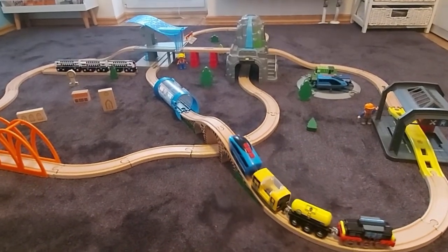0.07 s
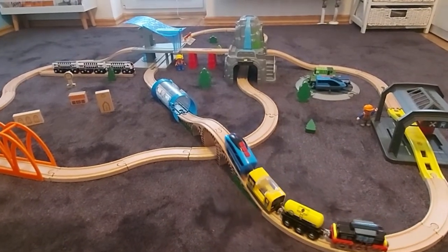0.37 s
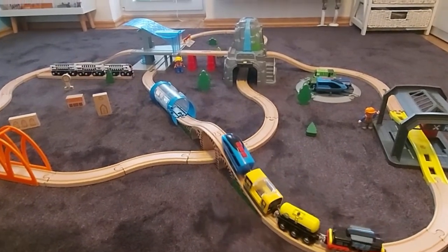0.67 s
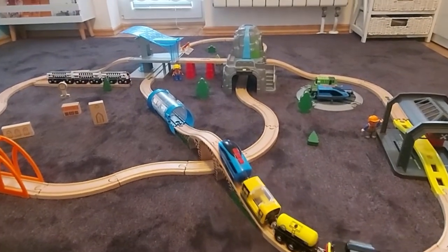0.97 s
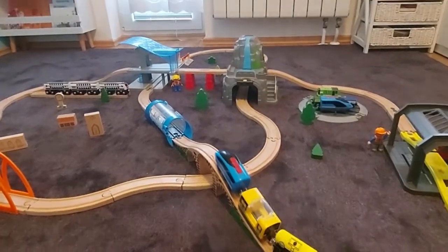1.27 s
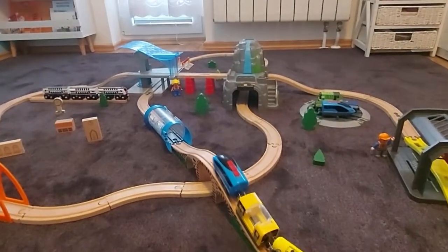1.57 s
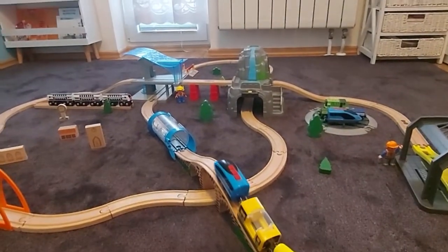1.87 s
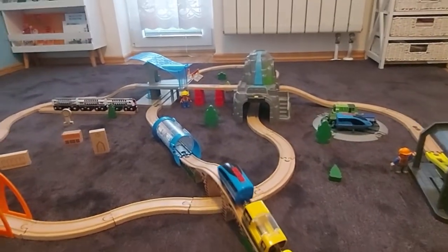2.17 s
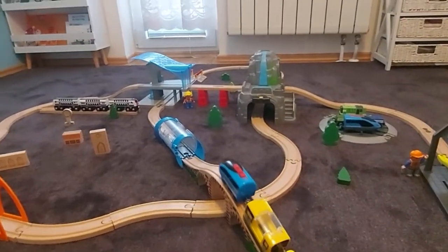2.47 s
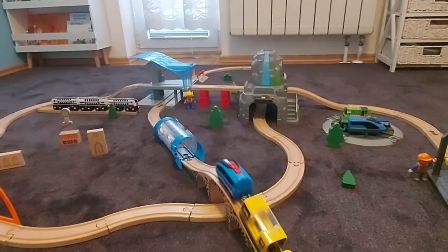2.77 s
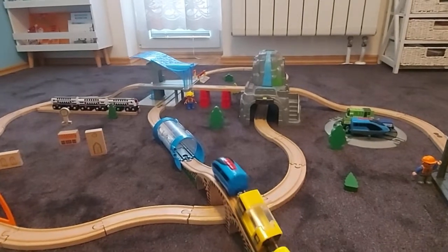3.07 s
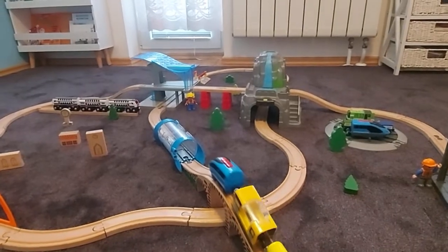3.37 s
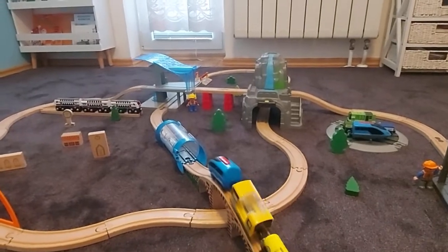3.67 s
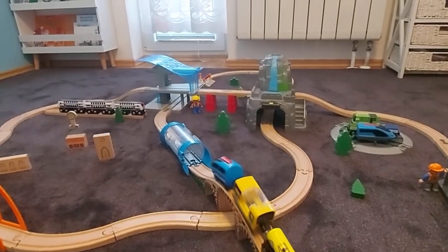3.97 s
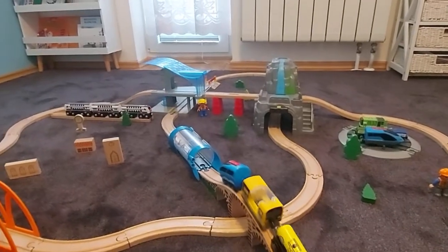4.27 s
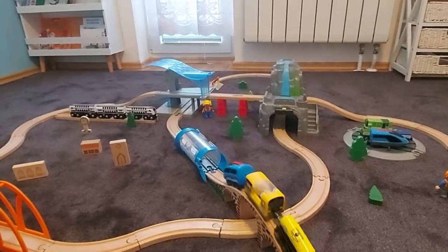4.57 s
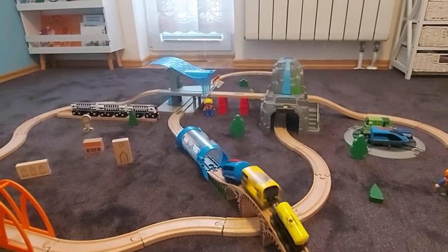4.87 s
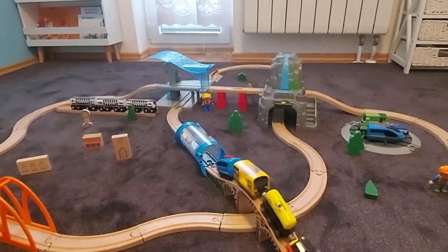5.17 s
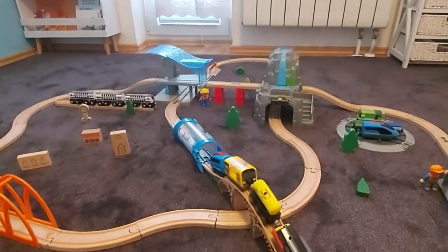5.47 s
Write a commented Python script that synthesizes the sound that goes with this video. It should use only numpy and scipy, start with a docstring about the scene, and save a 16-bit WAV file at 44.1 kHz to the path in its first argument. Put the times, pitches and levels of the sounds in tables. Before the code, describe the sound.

In a carpeted room, about a metre from the microphone, a toy train's electric motor strains with a rattling buzz and stuttering bursts of hard plastic ratcheting. Its wheels rumble softly and bump over the joints of a wooden track while couplings tick. Past the middle the load eases: the ratcheting ends and a gear whine rises in pitch and takes over, with thin high axle squeaks and one light knock.

```python
"""The gearbox of a battery toy engine hauling wagons up a wooden bridge in a carpeted room, a metre away.
Under load a gear slips in short runs; each impact, one per gear turn, excites the modes of the plastic
housing and stirs up tooth chatter. Over the crest the motor speeds up and the chatter gives way to a whine
on harmonics of the shaft rate. Friction makes the brushes hiss and the dry axles squeal, while the wheels
rumble on the wood and bump at the rail joints, and the couplings tick."""
import sys
import numpy as np
from scipy import signal
from scipy.fft import rfft, irfft
from scipy.io import wavfile
from scipy.ndimage import uniform_filter1d, minimum_filter1d

SR = 44100
rng = np.random.default_rng(int(sys.argv[2]) if len(sys.argv) > 2 else 0)


def inscribe(sig):
    """Save sig as 16-bit PCM at rate SR to the path in sys.argv[1].

    A 1-D sig is mono; a 2-D sig holds one channel per row.
    Samples are clipped to [-1, 1] before scaling.
    """
    pcm = np.round(np.clip(np.atleast_2d(sig).T, -1, 1) * 32767)
    wavfile.write(sys.argv[1], SR, pcm.astype(np.int16))


N = 243873
TIME = np.arange(N) / SR

# spectrum of the wheel rumble: frequency_hz, gain_db
RUMBLE_SPECTRUM = [(20, -34), (30, -26), (42, -11), (65, -6), (110, -6), (200, -9), (400, -28)]
# resonances of the hollow track: frequency_hz, gain_db
TRACK_SPECTRUM = [(30, -40), (120, -24), (230, -5), (330, 2), (550, -4), (720, -17), (1000, 5),
                  (2000, -33.5)]
# soft bumps at rail joints: start_s, level_db, pitch_hz, track_ring_db
JOINT_BUMPS = [(.548, -31, 70, -43.5), (0.746, -31, 80, -39), (0.934, -33, 80, -37),
               (.999, -35.5, 100, -49), (1.179, -41, 70, -55), (1.27, -53, 300, -41),
               (1.658, -37.5, 91, -42.5), (3.17, -35, 95.1, -57), (4.559, -13, 1307, -39),
               (4.629, -22, 542, -46)]
# ticks of the couplings: start_s, body_db, bright_edge_db
COUPLING_TICKS = [(0.1033, -17, -44), (0.5382, -34, -41), (0.9187, -32, -38), (1.2451, -17, -43),
                  (1.6536, -15, -41), (2.389, -15, -40), (2.5025, -11.5, -41), (2.8294, -15, -38),
                  (2.8694, -14, -36), (2.9996, -15, -38), (3.3969, -11, -48), (3.5302, -13, -45),
                  (3.7553, -10, -53), (4.6208, -10, -33.5)]
# squeals of dry axles: start_s, end_s, start_pitch_hz, end_pitch_hz, bandwidth_hz, level_db
AXLE_SQUEALS = [(-.2, 1.084, 5250, 5320, 242, -40.5), (0.204, 1.103, 8960, 9200, 219, -50.5),
                (0.599, 1.598, 10680, 10570, 896, -49.5), (1.2, 2.5, 7870, 7150, 450, -48),
                (2.542, 3.95, 14160, 13400, 910, -49), (3.798, 5.601, 13190, 13200, 701, -49),
                (4.05, 4.7, 6540, 6520, 506, -33.5), (4.805, 5.7, 6970, 7780, 700.3, -37)]
# motor speed, labouring on the climb and then running free: time_s, shaft_rate_hz
SHAFT_SPEED = [(0, 141.4), (.3, 138.1), (.7, 142.1), (1.2, 140), (1.5, 132.9), (1.8, 142.4), (2.4, 142.6),
               (2.75, 146.8), (3.0, 153), (3.82, 153.3), (3.898, 162.1), (4.282, 179.2), (4.35, 177.6),
               (4.384, 183.1), (4.706, 192.8), (4.73, 189), (4.966, 194.8), (5.04, 190.3), (5.386, 192.5),
               (5.48, 195.9)]
# effort of the drive: time_s, gear_noise_db, brush_hiss_db
DRIVE_LEVELS = [(0, -21.5, -33), (.4, -24.5, -36), (.8, -21, -36.5), (1.15, -27, -35.5),
                (1.6, -35.5, -33.5), (2.3, -26, -33), (3.0, -18.5, -29), (3.7, -19, -27.5),
                (3.92, -20.5, -29.5), (4.4, -13.5, -28.5), (5.0, -15, -31), (5.53, -17.5, -31.5)]
# spectrum of the brush hiss: frequency_hz, gain_db
BRUSH_SPECTRUM = [(2500, -13.5), (4200, 0.5), (4900, -3.5), (5400, 1), (5900, 1), (6700, 2.5), (7700, -2.5),
                  (8350, -14), (8700, -7.5), (9600, -10.5), (10500, -11), (12200, -14), (13500, -15),
                  (15800, -26)]
# commutator tones on the shaft rate: harmonic_number, level_db
COMMUTATOR_TONES = [(32, 6), (36, 7), (39, 6), (42, -1), (44, -0.5), (45, -6), (48, -2.5), (51, -4.5),
                    (57, -6)]
# buzz of loose wagon parts, relative to the gear noise: time_s, level_db
LOOSE_PART_LEVELS = [(0, -12.5), (1.3, -12), (1.8, -43), (5.53, -22)]
# resonances of those parts: frequency_hz, gain_db
LOOSE_PART_SPECTRUM = [(450, -21), (580, -5), (690, -9), (830, -3.5), (1000, 5.5), (1250, -5.5),
                       (3200, -12), (3800, 4.5), (4550, 7), (5000, -0.5), (6500, -17), (9000, -17)]
# gear whine under load: harmonic_number, level_db
LOADED_HARMONICS = [(1, -34), (2, -20), (3, -54), (4, -24), (5, -22), (6, -14), (7, -13), (8, -4.5),
                    (9, -4.5), (10, 2.5), (11, 2), (12, 6), (13, 11), (14, 6), (15, -16), (16, -4),
                    (17, -5), (18, -23)]
# gear whine running free: harmonic_number, level_db
FREE_HARMONICS = [(1, -40), (2, -61), (3, -28.5), (4, -45), (5, -16.5), (6, -17.5), (7, -0.5), (8, -11),
                  (9, -0.5), (10, -3), (11, -6), (12, 1), (13, -4), (14, -19), (15, -5.5), (16, -7),
                  (17, -16), (18, -15), (19, -22), (20, -19), (21, -29), (22, -18), (23, -21), (24, -29),
                  (25, -35), (26, -28), (27, -23), (28, -16.5), (29, -22), (30, -21.5)]
# prominence of the seven-tooth pinion's tone: time_s, gain_db
PINION_GAIN = [(4.3, -3), (4.85, -5.5), (5.1, -2.5), (5.38, 4), (5.53, 3)]
# response of the housing to tooth chatter: frequency_hz, gain_db
CHATTER_SPECTRUM = [(400, -39.5), (820, -37), (1000, -4), (1200, -7), (1400, 3), (1800, 6), (2350, -0.5),
                    (2700, 4.5), (2950, 3.5), (3300, -3.5), (4500, -11.5), (4950, -47), (5500, -20),
                    (8500, -37.5)]
# weak housing modes rung by a skipped tooth: frequency_hz, gain_db
HOUSING_SPECTRUM = [(200, -27.5), (750, -34.5), (1000, -17.5), (1250, 2.5), (1650, 4), (2300, 4.5),
                    (2900, -2.5), (3400, -6), (3800, -3.5), (4550, -3), (4950, -13.5), (5500, -7.5),
                    (7500, -18.5), (9000, -27.5)]
# runs of slipping, where a final half turn is the gear catching early: start_s, length_turns, level_db
SLIP_RUNS = [(.0196, 0, -8), (.0759, 3.5, -3.5), (.2195, 3, -4.5), (.4217, 1, -7), (.508, 0, -7),
             (.5653, 1, -6.5), (.6495, 8, -2.5), (.9322, 1, -8.5), (.9887, 1.5, -5), (1.0741, 0, -5),
             (1.1606, 0, -10), (1.2178, 0, -8.5), (1.2461, 2.5, -1.5), (1.3637, 1, -1.5), (1.4546, 0, -4),
             (1.5721, 1, -6.5), (1.6624, 0, -2.5), (1.7188, 1.5, -2), (1.8025, 1, -5), (1.8596, 6.5, -1),
             (2.0842, 3.5, -1), (2.2257, 2.5, -2), (2.3124, .5, -2), (2.3375, 4.5, -1), (2.4763, 4.5, -1),
             (2.6159, 4.5, -1), (2.7534, 0, -1), (2.8079, 0, -1), (2.889, 2, -1.5), (2.9947, 1, -1.5),
             (3.0722, 1, -1), (3.2476, 0, -2), (3.3338, 1, -2), (3.4168, 0, -2), (3.5467, 0, -1.5),
             (3.6002, 0, -1)]

LABOUR_HZ, FREE_HZ = 141, 191  # shaft rate under full load and with none
GEAR_RATIO = 4  # shaft turns per turn of the slipping gear
DECK_S, DECK_WIDTH_S, DECK_DB = 4.025, 0.27, -40  # the engine crosses the hollow deck of the bridge
TRACK_RISE_S, TRACK_RING_S = .005, 0.16  # time constants of the track around a bump
STIR_DB, STIR_RISE_S, STIR_SETTLE_S = -20.5, 0.0084, 0.052  # swell of chatter around a knock


def undb(db):
    """Amplitude ratio of a level in decibels."""
    return 10 ** (np.asarray(db) / 20)


def unit(x):
    """Normalisation to rms 1."""
    return x / np.sqrt(np.mean(x ** 2))


def curves(table):
    """Linear interpolation in time of each column after the first."""
    times, *columns = np.transpose(table)
    return [np.interp(TIME, times, column) for column in columns]


def drift(rate_hz):
    """Band-limited noise of rms 1, interpolated between random values drawn at rate_hz."""
    points = signal.resample_poly(rng.standard_normal(int(N / SR * rate_hz) + 4), 10, 1)
    return unit(np.interp(TIME * rate_hz * 10, np.arange(len(points)), points))


def response(spectrum, size=4096):
    """Minimum-phase impulse response of a spectrum, by folding its cepstrum."""
    hz, db = np.transpose(spectrum)
    grid = np.maximum(np.fft.rfftfreq(size, 1 / SR), 1)
    magnitude = undb(np.interp(np.log(grid), np.log(hz), db))
    cepstrum = irfft(np.log(magnitude))
    cepstrum[1:size // 2] *= 2
    cepstrum[size // 2 + 1:] = 0
    return irfft(np.exp(rfft(cepstrum)))


def ring(x, impulse):
    """Convolution of an excitation with an impulse response."""
    return signal.fftconvolve(x, impulse)[:N]


def add(out, start_s, sound):
    """Superposition of a short sound on the output."""
    start = int(np.clip(start_s * SR, 0, N - 1))
    out[start:start + len(sound)] += sound[:N - start]


def burst(hz, octaves, t60, size=8192):
    """Exponential decay of a band of noise, peak 1."""
    grid = np.maximum(np.fft.rfftfreq(size, 1 / SR), 1)
    band = np.exp(-.5 * (np.log2(grid / hz) / octaves) ** 2)
    noise = irfft(rfft(rng.standard_normal(size)) * band)
    t = np.arange(size) / SR
    sound = noise * np.exp(-np.log(1000) * t / t60) * (1 - np.exp(-t * hz))
    return sound / np.abs(sound).max()


def settling(hits, rise_s, settle_s):
    """Incoherent addition: envelopes rise to each hit (time_s, level_db), decay, and sum in power."""
    times, db = np.transpose(hits)
    grid = TIME[::32]
    since = grid[:, None] - times
    envelopes = undb(db) * np.exp(np.minimum(since / rise_s, -since / settle_s))
    return np.interp(TIME, grid, np.linalg.norm(envelopes, axis=1))


def room(x, tail_db=-7.0, t60=0.27, onset_s=0.0094, size=20000):
    """Reverberation: a diffuse tail follows the direct sound, kept short by absorption in the carpet."""
    t = np.arange(size) / SR
    tail = rng.standard_normal(size) * np.exp(-np.log(1000) * t / t60) * (1 - np.exp(-(t / onset_s) ** 2))
    impulse = undb(tail_db) * tail / np.linalg.norm(tail)
    impulse[0] = 1
    return ring(x, impulse)


def wheels(turns, ease, rumble_db=-50, rumble_gain_db=1, track_db=-53, rolling_db=6, uneven_db=2,
           hum_db=-54, unload_db=-8, waver_db=3.5):
    """Structure-borne sound: rolling, bumps and the shake of the motor drive the wooden track."""
    rumble_gain = undb(rumble_db + rumble_gain_db * ease + uneven_db * drift(4.9))
    rumble = rumble_gain * unit(ring(rng.standard_normal(N), response(RUMBLE_SPECTRUM)))
    rolling = undb(track_db + rolling_db * ease + uneven_db * drift(6))
    deck = undb(DECK_DB) * np.exp(-((TIME - DECK_S) / DECK_WIDTH_S) ** 2)
    jolts = settling([(s, ring_db) for s, _, _, ring_db in JOINT_BUMPS], TRACK_RISE_S, TRACK_RING_S)
    wood = unit(ring(rng.standard_normal(N), response(TRACK_SPECTRUM)))
    hollow = np.sqrt(rolling ** 2 + deck ** 2 + jolts ** 2) * wood
    hum = undb(hum_db + unload_db * ease + waver_db * drift(6.63)) * np.sin(2 * np.pi * turns)
    return rumble + hollow + hum


def axles(waver=0.0058):
    """Friction-induced vibration: dry axles squeal in narrow noise bands of unsteady pitch."""
    out = 0
    for start, end, from_hz, to_hz, width_hz, db in AXLE_SQUEALS:
        progress = np.clip((TIME - start) / (end - start), 0, 1)
        pitch_hz = (from_hz + (to_hz - from_hz) * progress) * (1 + waver * drift(14))
        phase = 2 * np.pi * np.cumsum(pitch_hz) / SR
        tone = drift(width_hz) * np.sin(phase) + drift(width_hz) * np.cos(phase)
        out = out + undb(db) * np.sqrt(4 * progress * (1 - progress)) * tone
    return out


def wagons(bump_db=-2, tick_db=-3, snap_db=11, tick_t60=0.043):
    """Damped impacts: wagons bump over the rail joints and their couplings tick."""
    out = np.zeros(N)
    for start_s, db, hz, _ in JOINT_BUMPS:
        add(out, start_s, undb(db + bump_db) * burst(hz, octaves=.7, t60=0.17))
    for start_s, body_db, edge_db in COUPLING_TICKS:
        add(out, start_s, undb(body_db + tick_db) * burst(hz=5700, octaves=0.34, t60=tick_t60))
        add(out, start_s, undb(edge_db + snap_db) * burst(hz=11500, octaves=0.31, t60=tick_t60))
    return out


def brushes(turns, sing_db, flutter=0.24, flicker_db=3):
    """Sliding contact: brushes hiss on the commutator, whose segments sing on high shaft harmonics."""
    friction = rng.standard_normal(N) * (1 + flutter * np.sin(2 * np.pi * turns))
    tones = sum(undb(db + flicker_db * drift(30)) * np.sin(2 * np.pi * (k * turns + rng.random()))
                for k, db in COMMUTATOR_TONES)
    return unit(ring(friction, response(BRUSH_SPECTRUM))) + undb(sing_db) * unit(tones)


def blows(turns, scatter_db, jitter, per_turn):
    """Quasi-periodic excitation: impulses tied to the shaft, scattered in timing and strength."""
    timing, strength = rng.standard_normal((per_turn * 2048, 2)).T
    beats = np.arange(len(timing)) + jitter * timing
    at = np.searchsorted(turns * per_turn, beats)
    inside = (at > 0) & (at < N)
    pulses = np.zeros(N)
    np.add.at(pulses, at[inside], undb(scatter_db[at[inside]] * np.clip(strength[inside], -2, 2)))
    # the gears pass on the same power however unevenly it comes
    power = uniform_filter1d(pulses ** 2, size=4410, mode="reflect").clip(0)
    return pulses / np.sqrt(power + 1e-9)


def loose_parts(turns, scatter_db):
    """Forced vibration: small plastic parts on the wagons buzz along with the gears."""
    shake_db, = curves(LOOSE_PART_LEVELS)
    pulses = blows(turns, 2 * scatter_db, jitter=.35, per_turn=2)
    return undb(shake_db) * unit(ring(pulses, response(LOOSE_PART_SPECTRUM)))


def housing(colour, modes_db, hz=2330, swell_s=0.00032, modes_t60=0.016):
    """Modal response of the struck shell: the main resonance dies in a few cycles, weak modes ring on."""
    size = len(colour)
    t = np.arange(size) / SR
    swell = (t / swell_s) ** 4 * np.exp(-t / swell_s)
    main = swell * np.sin(2 * np.pi * hz * t)
    # random phases under a flat spectrum smear the blow in time without colouring it
    smear = rfft(rng.standard_normal(size) * np.exp(-np.log(1000) * t / modes_t60) * np.cumsum(swell))
    modes = irfft(smear / np.abs(smear) * rfft(colour)) * (t < t[-1] / 2)
    return (main + undb(modes_db) * unit(modes) * np.std(main)) / np.abs(main).max()


def chatter(turns, scatter_db, slap_db=1, teeth_db=-4):
    """Backlash: loose gears slap the housing once a shaft turn and their teeth patter in between."""
    colour = response(CHATTER_SPECTRUM)
    slaps = ring(blows(turns, scatter_db, jitter=0.201, per_turn=1), housing(colour, modes_db=-7))
    teeth = ring(blows(turns, scatter_db / 2, jitter=.4, per_turn=8), colour)
    # the rougher the mesh, the more the slaps stand out
    return unit(undb(slap_db + scatter_db - scatter_db.max()) * unit(slaps) + undb(teeth_db) * unit(teeth))


def whine(turns, hz, loaded_hz=172, free_hz=190, wobble=0.3, flicker_db=1.88, disorder_rad=3.03):
    """Periodic meshing gives shaft harmonics, amplitude-modulated by a slow, slightly eccentric wheel."""
    free = np.clip((hz - loaded_hz) / (free_hz - loaded_hz), 0, 1)
    wheel_phase = 2 * np.pi * turns / 8
    pinion_db, = curves(PINION_GAIN)
    out = 0
    for k, free_db in FREE_HARMONICS:
        loaded_db = np.interp(k, *np.transpose(LOADED_HARMONICS))
        # the harmonics start partly in phase, so the whine buzzes once a turn
        phase, throb_phase = rng.uniform(-0.8, 1, 2) * np.array([disorder_rad, np.pi])
        gain = undb(loaded_db + free * (free_db - loaded_db) + flicker_db * drift(25))
        if k == 7:  # the pinion's mesh frequency
            gain = gain * undb(pinion_db)
        throb = 1 + wobble * np.sin(wheel_phase + throb_phase)
        out = out + gain * throb * np.sin(2 * np.pi * k * turns + phase)
    return unit(out)


def gearbox(turns, hz, ease, stirred, chatter_db=-3, chatter_fall_db=-8, whine_db=3, whine_fall_db=-22,
            slack_at=0.3, slack_width=.2, slack_db=4, even_scatter_db=2.3, slack_scatter_db=2.5):
    """Load-dependent meshing: chatter yields to whine as the load eases; in between, slack teeth rattle."""
    effort = undb(curves(DRIVE_LEVELS)[0])
    slack = np.exp(-((ease - slack_at) / slack_width) ** 2)
    scatter_db = even_scatter_db + slack_scatter_db * slack
    shaken = np.hypot(effort, stirred)
    rattle = undb(chatter_db + chatter_fall_db * ease ** 2 + slack_db * slack) * chatter(turns, scatter_db)
    tone = undb(whine_db + whine_fall_db * (1 - ease) ** 2) * whine(turns, hz)
    return shaken * (rattle + loose_parts(turns, scatter_db)) + effort * tone


def slip_hits(turns, taper_db=-2, scatter_db=.7):
    """Periodic slip: one hit (time_s, level_db) per gear turn, hardest in the middle of a run."""
    hits = []
    for start_s, length, db in SLIP_RUNS:
        gear_turns = np.append(np.arange(length), length)
        shaft_turns = np.interp(start_s, TIME, turns) + GEAR_RATIO * gear_turns
        times = np.interp(shaft_turns, turns, TIME)
        from_middle = (2 * gear_turns - length) / (length + 1)
        hits += zip(times, db + taper_db * from_middle ** 2 + scatter_db * rng.standard_normal(len(times)))
    return hits


def slipping_gear(hits, gain_db=1, detune=0.029, bounce_db=-15, bounce_s=.003):
    """Impact excitation: each jumped tooth gives the housing one hard knock and a weak rebound."""
    out, colour = np.zeros(N), response(HOUSING_SPECTRUM)
    for start_s, db in hits:
        pitch_hz = 2330 * (1 + detune * rng.standard_normal())
        knock = undb(db + gain_db) * housing(colour, modes_db=-9.5, hz=pitch_hz)
        add(out, start_s, knock)
        add(out, start_s + bounce_s * (1 + rng.random()), undb(bounce_db) * knock)
    return out


def scene(gear_db=0.5, hiss_db=-3, sing_db=-4, sing_fall_db=-11, wow=.002, hunting=0.0022):
    """Superposition of all sources, with one rotating shaft timing every part of the engine."""
    hz, = curves(SHAFT_SPEED)
    _, brush_db = curves(DRIVE_LEVELS)
    ease = np.clip((hz - LABOUR_HZ) / (FREE_HZ - LABOUR_HZ), 0, 1)  # 0 under full load, 1 with none
    # the lighter the load, the more the speed wanders
    turns = np.cumsum(hz * (1 + wow * drift(45) + hunting * ease * drift(12))) / SR
    hits = slip_hits(turns)
    stirred = undb(STIR_DB) * settling(hits, STIR_RISE_S, STIR_SETTLE_S)
    gears = gearbox(turns, hz, ease, stirred)
    hiss = undb(brush_db + hiss_db) * brushes(turns, sing_db + sing_fall_db * (1 - ease) ** 2)
    engine = undb(gear_db) * gears + hiss + slipping_gear(hits)
    return (room(engine + axles() + wagons()) + wheels(turns, ease))[None]


def record(dry, ceiling=0.77, low_hz=42, top_hz=15600):
    """Band and peak limiting: the deepest bass is shed, the hardest knocks are held, the top is cut."""
    x = signal.sosfilt(signal.butter(2, low_hz, "high", fs=SR, output="sos"), dry)
    gain = np.minimum(1, ceiling / (np.abs(x) + 1e-9))
    gain = uniform_filter1d(minimum_filter1d(gain, size=21), size=21)
    return signal.sosfilt(signal.ellip(10, .2, 80, top_hz, fs=SR, output="sos"), x * gain)


dry = scene()
out = record(dry)
inscribe(out)
```